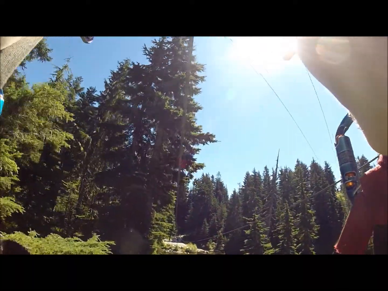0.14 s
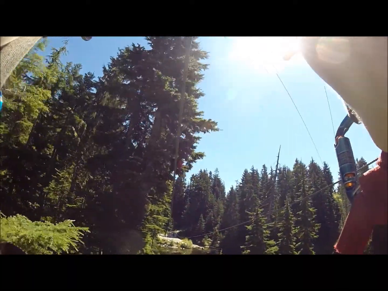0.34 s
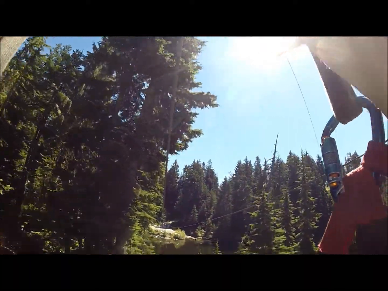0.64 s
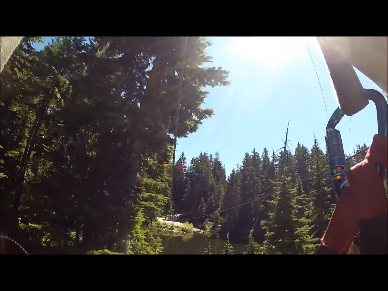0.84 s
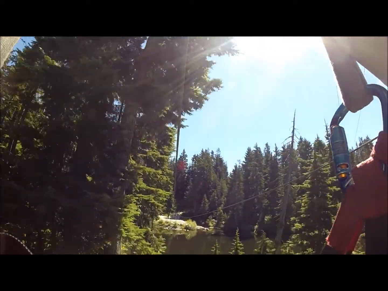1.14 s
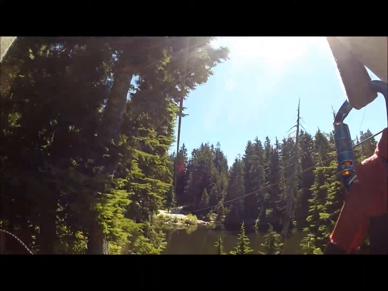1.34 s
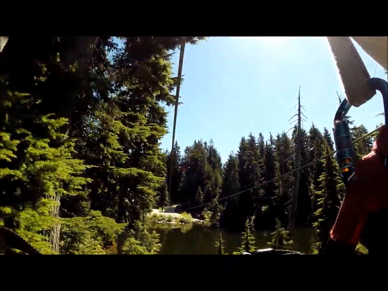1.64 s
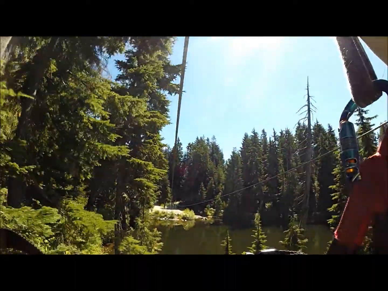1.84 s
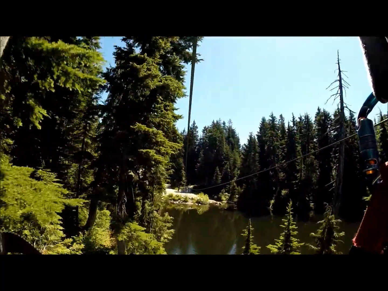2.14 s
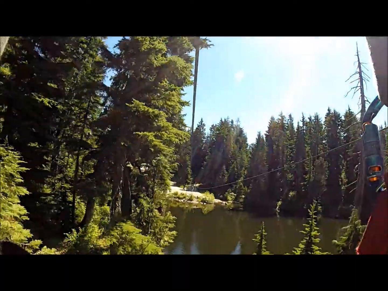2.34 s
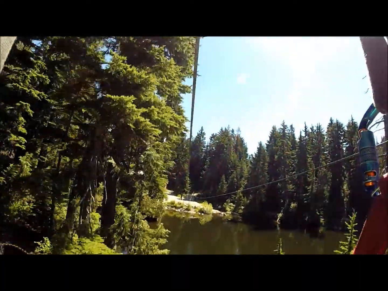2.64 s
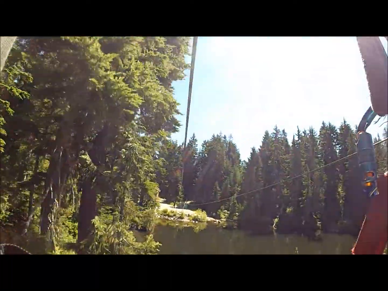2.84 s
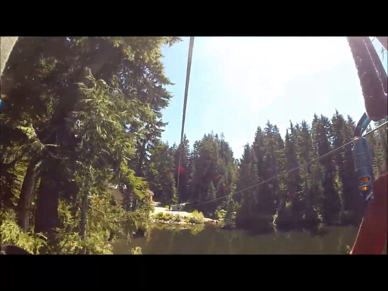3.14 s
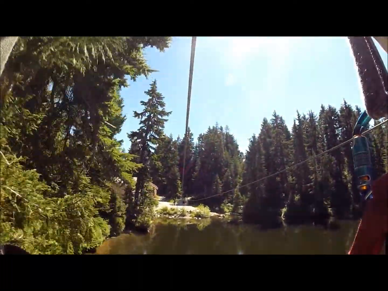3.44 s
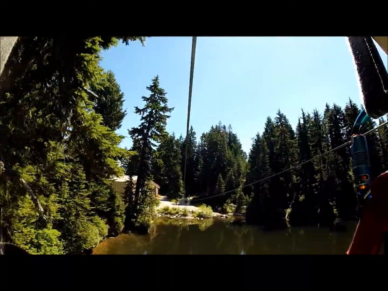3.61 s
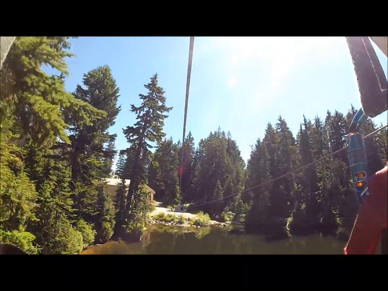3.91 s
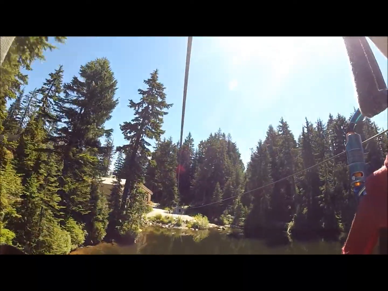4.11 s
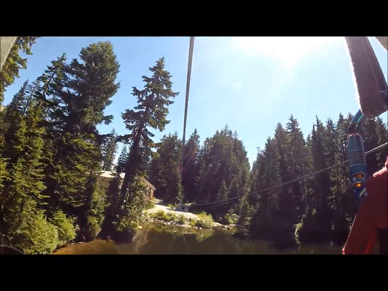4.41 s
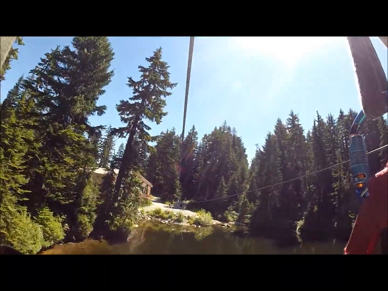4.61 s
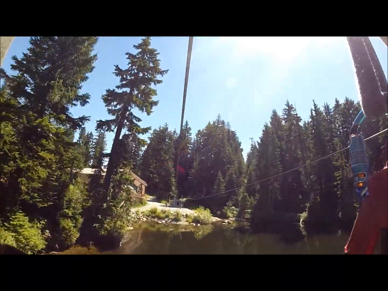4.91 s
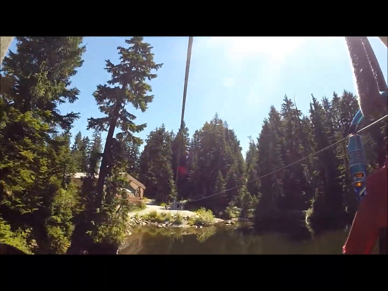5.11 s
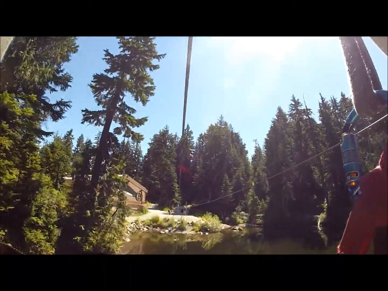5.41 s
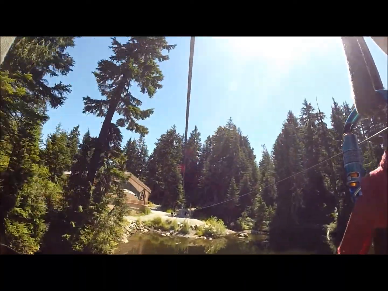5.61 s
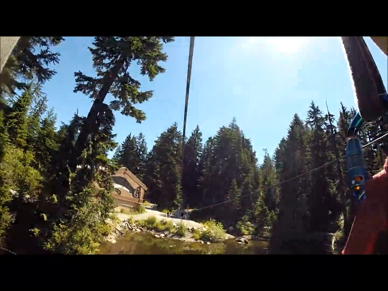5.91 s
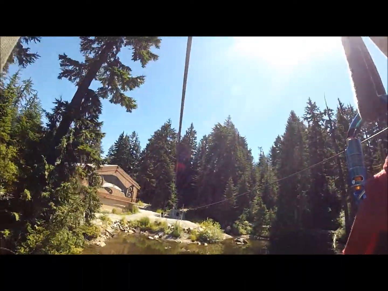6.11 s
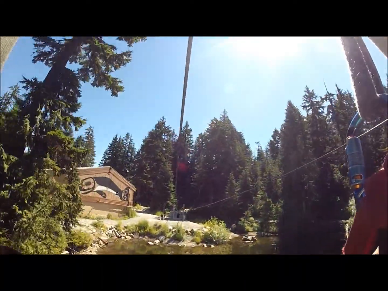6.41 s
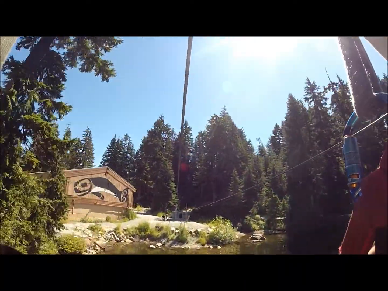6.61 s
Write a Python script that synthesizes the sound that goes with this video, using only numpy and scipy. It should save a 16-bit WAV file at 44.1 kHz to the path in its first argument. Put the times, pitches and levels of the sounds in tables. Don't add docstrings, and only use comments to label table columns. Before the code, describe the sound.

Close, boxy sound from a small microphone sealed in a case on a zipline rider's harness. Deep rumble dominates, with an uneven rising hum from the wheel and thin steely hiss. Early strap slips, scrapes and a low tug lead to a sharp clip crack; the level ducks and slowly recovers. Then a steadier, faster roll with wind gusts, faint bearing tones and a final dull thump.

```python
import sys
import numpy as np
from scipy import signal
from scipy.fft import rfft, irfft, next_fast_len
from scipy.io import wavfile
from scipy.ndimage import uniform_filter1d, map_coordinates

SR = 44100
rng = np.random.default_rng(int(sys.argv[2]) if len(sys.argv) > 2 else 0)


def volts_from_decibels(level):
    exponent = np.asarray(level, float) / 20
    return 10 ** exponent


def log_audio(samples):
    frames = np.atleast_2d(samples).T
    limited = np.clip(frames, -1, 1)
    pcm = np.round(limited * 32767).astype(np.int16)
    wavfile.write(sys.argv[1], SR, pcm)


N = 297756

# t/s, strand rate f/Hz
RIDE_SPEED = [(0.0, 122.5), (0.5, 152), (1.0, 176.8), (1.3, 193.9), (1.7, 208.2), (2.5, 248.5),
              (2.9, 257.6), (3.3, 275.5), (4.1, 298.5), (5.0, 318.9), (6.2, 335.6), (6.75, 340.6)]
# order/strand rate, level/dB against the rumble, strongest t/s, duration/s
WHEEL_TURNS = [(.096, -8, 6.6, 1.5), (.168, -9, 5, 2), (.336, -7, 3.4, .8), (.336, -8, 6.3, 1.2),
               (.43, -11, 2.8, .6), (.44, -5, 1.85, .15), (.904, -3, .2, .25), (.904, -8, 2.8, .2),
               (.578, -12, 6, 1.2), (.756, -11, 4, .4), (.857, -11, 5, 1.5), (.904, -8, 4.6, 1.5),
               (1.097, -13, 3.6, 1), (1.097, -15, 6.2, .3)]
# f/Hz, width/Hz, level/dB
CASE_MODES = [(3740, 250, -0.5), (4270, 130, -5.5), (4540, 290, -11), (5450, 154, -6.5), (5820, 237, -5),
              (7030, 370, -9.5), (7476, 220, -4), (8730, 110, -17.5), (9400, 250, -16), (10360, 240, -18),
              (12200, 150, -23), (13500, 240, -23.5), (14400, 400, -30)]
FULL_LOAD_DB = -38


def unit(x):
    return x / np.sqrt(np.mean(x ** 2) + 1e-20)


def curves(rows):
    s, *cols = np.transpose(rows)
    return [np.interp(np.arange(N) / SR, s, c) for c in cols]


def wobble(rate):
    coarse = np.arange(0, N + 16, 16)
    knots = rng.standard_normal(int(N * 400 / SR) + 4)
    return np.interp(np.arange(N), coarse, map_coordinates(knots, [coarse * rate / SR]))


def filtered(x, response, rate=SR):
    m = next_fast_len(len(x) + 8192)
    return irfft(rfft(x, m) * response(np.fft.rfftfreq(m, 1 / rate)), m)[:len(x)]


def shape(points):
    f, db = np.transpose(points)
    return lambda hz: volts_from_decibels(np.interp(np.log(hz + 1e-9), np.log(f), db, -120, -120))


def modes(peaks):
    def response(f):
        return sum((-1) ** k * volts_from_decibels(db) * 1j * f * width / (center * center - f * f + 1j * f * width)
                   for k, (center, width, db) in enumerate(peaks))
    return response


def dull(top_hz):
    return lambda hz: 1 / (1 + 1.2j * hz / top_hz - (hz / top_hz) ** 2) ** 2


def patchy(depth_db):
    z = signal.stft(rng.standard_normal(N), nperseg=256)[2]
    field = uniform_filter1d(rng.standard_normal(z.shape), size=5, axis=0)
    field = uniform_filter1d(field, size=16, axis=1, mode="wrap")
    return signal.istft(z * volts_from_decibels(depth_db * unit(field)), nperseg=256)[1][:N]


def strands():
    return np.cumsum(curves(RIDE_SPEED)[0]) / SR


def load():
    # t/s, level/dB
    force = [(0, -55), (.8, -43.5), (1.45, -45.5), (1.7, -38), (2.1, -39), (2.45, -37), (2.7, -40.5),
             (2.85, -38.5), (3.5, -38), (4.15, -38), (4.45, -36.5), (4.62, -37.5), (4.76, -35.5),
             (5.1, -38.5), (5.8, -38), (6.1, -36.5), (6.75, -37.5)]
    return curves(force)[0] - FULL_LOAD_DB


def lines(table, passed, flutter_db, drift, pace=6):
    t, out = np.arange(N) / SR, np.zeros(N)
    for order, db, s, span in table:
        level = volts_from_decibels(db - 4.07 * ((t - s) / span) ** 2 + flutter_db * wobble(pace))
        out += level * np.sin(2 * np.pi * order * passed + drift * wobble(pace))
    return out


def whine():
    # t/s, level/dB
    drumming = [(0, -25), (.33, -25.5), (.45, -35), (.55, -22.5), (.72, -25), (.93, -38), (1.24, -17.5),
                (1.48, -32.5), (1.75, -22.5), (2.03, -29.5), (2.2, -24), (2.57, -18.5), (2.7, -21),
                (3.24, -14.5), (3.92, -13), (4.1, -19), (4.5, -15), (5, -38.5)]
    # order/strand rate, level/dB, strongest t/s, duration/s
    overtones = [(1, -26, 5.54, 0.12), (1, -21.5, 6.1, 0.072), (1, -21, 6.4, 0.17),
                 (2, -28.5, 0.556, 0.052), (2, -26.5, 0.875, 0.11), (2, -34.5, 1.1, 0.061),
                 (2, -34.5, 1.85, 0.09), (2, -35.5, 3.38, .16), (2, -39, 3.776, .17), (2, -43, 4.3, 0.15),
                 (3, -42.5, 0.19, 0.2), (3, -41.5, 0.534, 0.061), (3, -44.5, 1.336, 0.083),
                 (3, -51, 3.8, 0.34), (3, -49, 5, 0.22), (3, -45.5, 6.22, .25)]
    passed = strands()
    level = np.sqrt(2) * volts_from_decibels(curves(drumming)[0] + 2 * wobble(25))
    first = level * np.sin(2 * np.pi * passed + .2 * wobble(20))
    return first + lines(overtones, passed, flutter_db=3.5, drift=.8, pace=14)


def rumble():
    # t/s, level/dB
    wind = [(0, -19.5), (.27, -26.5), (1.2, -31), (1.55, -34.5), (1.9, -31), (2.2, -27), (2.7, -31.5),
            (3, -27.5), (3.4, -26.5), (3.8, -23.5), (4.32, -22), (4.6, -29), (5.1, -25), (6.2, -22.5),
            (6.5, -23.5), (6.75, -15)]
    # f/Hz, level/dB per Hz
    buffet_spectrum = [(8, -36), (20, -8), (45, 2.5), (80, -8.5), (140, -8), (300, -36.5)]
    # order/strand rate, level/dB
    roughness = [(.1, -4), (.5, 1.5), (.9, 0.5), (1.2, -0.5), (1.5, -6.5), (3, -6.5), (6, -25.5)]
    # f/Hz, level/dB per Hz
    let_through = [(40, -18.5), (80, -6.5), (107, -1.5), (163, -11.5), (247, -3.5), (300, -3.5), (345, -7),
                   (400, -11.5), (480, -19.5), (700, -31.5), (1100, -59.5)]
    # t/s, rumble level/dB
    shift = [
        (.8, -3),
        (1.33, -1),
        (1.42, -8),
        (1.63, -8.5),
        (1.8, -1),
        (2.4, -2),
        (2.7, 1),
    ]
    passed, per_strand = strands(), 16
    rough = filtered(rng.standard_normal(int(passed[-1] * per_strand) + 8), shape(roughness), rate=per_strand)
    rolled = map_coordinates(rough, [passed * per_strand])
    roll = filtered(rolled * volts_from_decibels(0.89 * wobble(20)), shape(let_through))
    roll /= np.sqrt(np.abs(uniform_filter1d(roll ** 2, size=SR)) + 1e-20)
    roll = roll + volts_from_decibels(3) * lines(WHEEL_TURNS, passed, flutter_db=2.2, drift=.3)
    roll_db = -22.5 + 0.19 * load() + curves(shift)[0]
    buffet = unit(filtered(rng.standard_normal(N), shape(buffet_spectrum)) * volts_from_decibels(1.6 * wobble(8)))
    return volts_from_decibels(curves(wind)[0]) * buffet + volts_from_decibels(roll_db) * roll


def roar():
    # f/Hz, width/Hz, level/dB
    tight_frame = [(544, 82, 0), (855, 650, -8.5), (1375, 241, -0.5), (1486, 84, 4.5), (1890, 267, -6.5),
                   (2136, 195, -5), (2700, 980, -17.5)]
    # f/Hz, width/Hz, level/dB
    slack_frame = [(580, 106, 0), (1060, 410, -10.5), (1346, 125, -1.5), (2090, 255, -14),
                   (2640, 450, -18.5)]
    # order/strand rate, level/dB against the roar, strongest t/s, duration/s
    bearing = [(6.54, -15, 5, .9), (6.14, -18, 6.2, .5), (6.605, -21, 5.8, .8), (5.66, -15, 5.7, .5),
               (5.8, -14, 5.2, .15), (7.55, -15, 3.4, .5), (7.1, -14, 2.9, .3), (8.016, -24, 5.8, 1),
               (8.45, -26, 5.2, 1), (4.3, -18, 5.8, 1), (4.52, -4, 4.77, .1), (4.75, -7, 4.85, .12),
               (4.4, -5, 5.95, .15), (4.12, -8, 5.92, .1)]
    passed = strands()
    turning = np.sin(2 * np.pi * WHEEL_TURNS[0][0] * passed)
    lumps = 0.29 * wobble(12) + 0.17 * wobble(60) + 1.1 * wobble(250) + 0.3 * turning
    grind = patchy(depth_db=0.87) * volts_from_decibels(lumps + 0.95 * wobble(40))
    tight = np.clip((np.arange(N) / SR - 1.2) / 0.99, 0, 1)
    frame = np.sqrt(tight) * unit(filtered(grind, modes(tight_frame)))
    frame += np.sqrt(1 - tight) * unit(filtered(grind[::-1], modes(slack_frame)))
    balls = lines(bearing, passed, flutter_db=4, drift=1.05)
    hiss = patchy(depth_db=0.7) * volts_from_decibels(1.7 * lumps + 0.29 * wobble(40))
    hiss = unit(filtered(hiss, modes(CASE_MODES)))
    hiss_db = -50 + 1.05 * load() + 1.23 * wobble(12)
    return volts_from_decibels(FULL_LOAD_DB + load()) * (frame + balls) + volts_from_decibels(hiss_db) * hiss


def strokes():
    # full level at t/s, level/dB, rise/(dB/s), hold/s, share of low scrape/0-1
    rubs = [(.39, -61, 200, 0.041, 0.1), (0.67, -49.5, 70, 0.14, 0), (0.855, -46.5, 124, .04, 0.8),
            (.9, -50.5, 99, .16, 0.3), (1.123, -58.5, 60, 0.25, 0.2), (1.38, -40, 697, .03, 0.96),
            (1.446, -48.5, 300, 0.09, 0.76), (1.56, -43, 195, 0.014, 1), (1.986, -39.5, 300, 0.075, 0.98),
            (2.15, -58, 100, .12, 0.6), (2.338, -38.5, 112, .01, 0.9), (2.478, -49, 100, 0.018, .02),
            (2.75, -50.5, 61, 0.14, .02)]
    t, power = np.arange(N) / SR, np.zeros((2, N))
    for s, db, rise, hold, low in rubs:
        rising_db = rise * np.maximum(s - t, 0)
        falling_db = 278 * np.maximum(t - s - hold, 0)
        power += volts_from_decibels(2 * (db - rising_db - falling_db)) * np.clip([[low], [1 - low]], 0, 1)
    return np.sqrt(power)


def webbing():
    # f/Hz, width/Hz, level/dB
    scrape_modes = [(1422, 420, -2), (2100, 270, -3), (2570, 230, 0.5), (3330, 150, -16)]
    low, thin = strokes()
    grains = patchy(depth_db=3.0) * volts_from_decibels(2.2 * wobble(300) + 1.2 * wobble(30))
    scrape = filtered(grains * volts_from_decibels(2.2 * wobble(50)), modes(scrape_modes))
    scrape = filtered(scrape, dull(top_hz=3300))
    return low * unit(scrape) + thin * unit(filtered(grains, modes(CASE_MODES)))


def jolts():
    # t/s, level/dB, pitch f/Hz
    tugs = [
        (0.7446, 3.5, 61.5),
        (.866, -23, 110),
        (2.37, -1, 89),
        (6.612, 11, 230),
    ]
    out, t = np.zeros(N), np.arange(SR // 10) / SR
    for s, db, hz in tugs:
        swing = (1 - np.exp(-t / 0.0033)) * np.sin(2 * np.pi * hz * t)
        out[round(s * SR):][:len(t)] -= volts_from_decibels(db - 2 - 38 * hz * t) * swing
    return out


def chatter():
    # t/s, level/dB, ringing f/Hz, thud level/dB, sharp tick level/dB
    strap_slips = [(.9836, -26, 2200, -18, -24), (1.0095, -24, 2200, -24, -24),
                   (1.049, -27, 2200, -20, -5.5), (1.383, -20, 1500, -14, -16), (1.394, -30, 1800, -8, -24),
                   (1.465, -28, 1700, -10, -22), (1.528, -6, 1550, -3, -22), (1.5487, -24, 2107, -5, -9),
                   (1.5552, -15.5, 1690, 0, -21), (1.5598, -14.5, 2210, -10, -14),
                   (1.5645, -12, 2400, -11, -11), (1.576, -17, 1600, -3, -15),
                   (1.5802, -17, 2200, -13, -14), (2.853, -21.5, 1797, -1, -45),
                   (2.8542, -21, 1840, 2, -43), (6.095, -23, 2106, -3, -26)]
    gap_s, loss_db, blunt_db, stick_db, settle_hz = .0018, 3.5, 6, -23, 1950
    hits = []
    for s, db, hz, thud_db, tick_db in strap_slips:
        for k in range(5):
            hit_db, odd = db - k * loss_db, k % 2
            if k == 0 or hit_db > stick_db:
                hits.append((s + k * gap_s, hit_db, settle_hz if odd else hz, thud_db, tick_db - blunt_db * odd))
    return hits


def slips():
    soft, ticks, t = np.zeros(N), np.zeros(N), np.arange(SR // 40) / SR

    def ring(hz, t60):
        return volts_from_decibels(-60 * t / t60) * np.sin(2 * np.pi * hz * t)

    shell = 1.5 * ring(3700, .005) + ring(4900, .004) + ring(6000, .005) + .6 * ring(7300, .005)
    for s, db, hz, thud_db, tick_db in chatter():
        thud = ring(700, .01) + ring(380, .015)
        body = ring(hz, .006) + .3 * ring(1.4 * hz, .004) + volts_from_decibels(thud_db) * thud
        soft[round(s * SR):][:len(t)] -= volts_from_decibels(db - 2.0) * body
        ticks[round(s * SR):][:len(t)] -= volts_from_decibels(db + tick_db - 0.5) * shell
    return filtered(soft, dull(top_hz=3200)) + filtered(ticks, dull(top_hz=5300))


def snap():
    hits = [
        (1.63417, 12),
        (1.6346, 10.5),
        (1.63498, 14),
        (1.6377, -9),
    ]
    clip_modes = [(124, -19, 0.057), (457, -52, 0.034), (1037.5, -46, 0.0078), (1710, -11, 0.015),
                  (1590, 0.5, 0.015), (1900, -1, 0.009), (2240, -4, 0.0023), (2790, -11, 0.0099),
                  (3300, -33, 0.007), (3660, -14, 0.013), (4260, -13, 0.017), (4760, -21, 0.012),
                  (5410, -11, .009)]
    # f/Hz, width/Hz, level/dB
    edge_modes = [(6800, 600, -13), (8400, 1100, 2), (10300, 670, 7), (11400, 1300, -1.5), (13500, 2000, 5)]
    t, blows = np.arange(SR // 8) / SR, np.zeros(N)
    for s, db in hits:
        blows[round(s * SR)] = volts_from_decibels(db)
    ring = np.zeros(len(t))
    for hz, db, t60 in clip_modes:
        ring += np.sign(hz - 300) * volts_from_decibels(db - 60 * t / t60) * np.sin(2 * np.pi * hz * t)
    rattle = unit(filtered(rng.standard_normal(len(t)), modes([(2500, 740, 0)])))
    rattle *= volts_from_decibels(-14 - 60 * t / 0.014) * (1 - np.exp(-t / 0.0013))
    body = signal.fftconvolve(blows, volts_from_decibels(-4.0) * ring + rattle)[:N]
    body = filtered(filtered(body, dull(top_hz=5400)), dull(top_hz=6500))
    return body + volts_from_decibels(-35) * filtered(blows, modes(edge_modes))


def scene():
    return (whine() + rumble() + roar() + webbing() + jolts() + slips() + snap())[None]


def band_limit(x):
    return signal.sosfilt(signal.butter(12, 15830, fs=SR, output="sos"), x)


def record(dry):
    # t/s, gain level/dB
    duck = [
        (1.615, 1),
        (1.63, -15.5),
        (1.7, -18.5),
        (2.6, -0.5),
    ]
    top_hz = 15000
    x = dry[0] * volts_from_decibels(curves(duck)[0])
    x = x / (1 + np.abs(x / 1.15) ** 12) ** (1 / 12)
    x = filtered(np.pad(x, (0, 512), "reflect"), lambda hz: 1 / (1 + (hz / top_hz) ** 70))
    return band_limit(x[None, :N])


dry = scene()
out = record(dry)
log_audio(out)
```